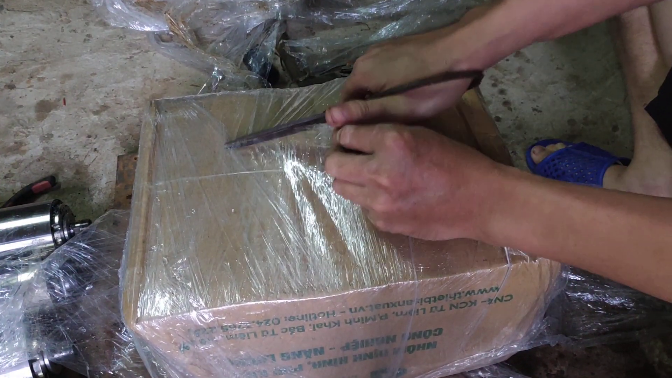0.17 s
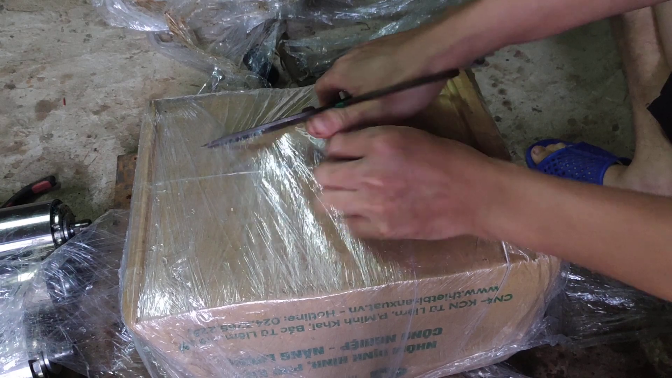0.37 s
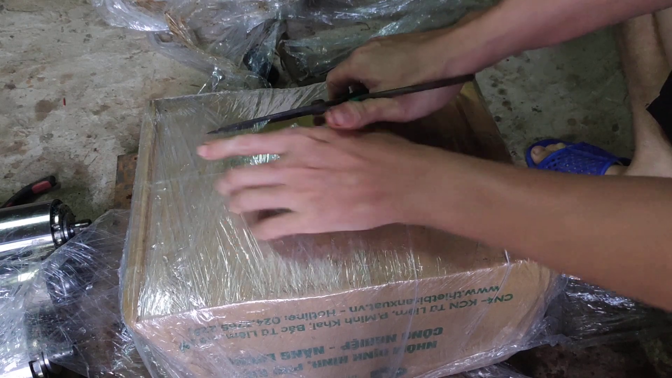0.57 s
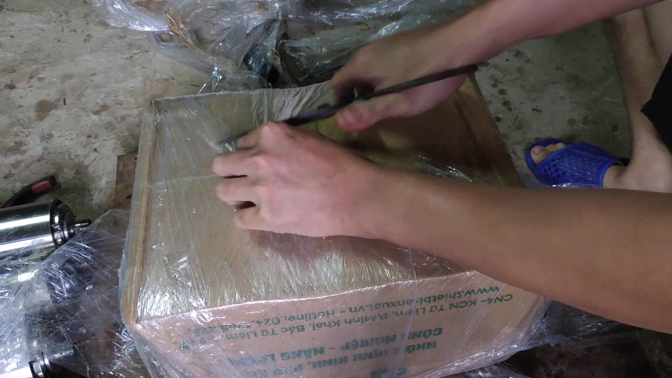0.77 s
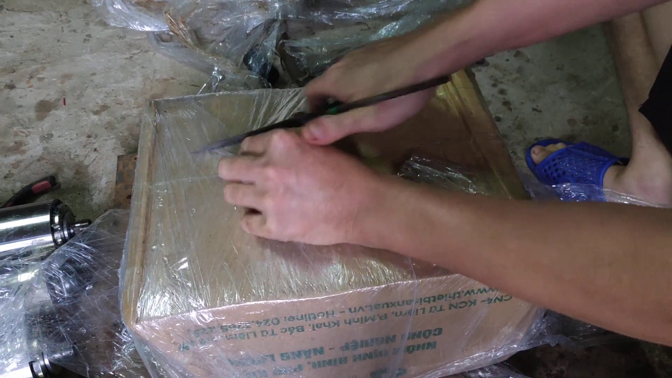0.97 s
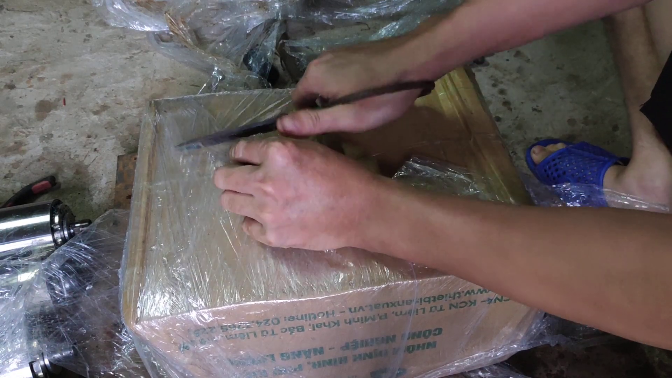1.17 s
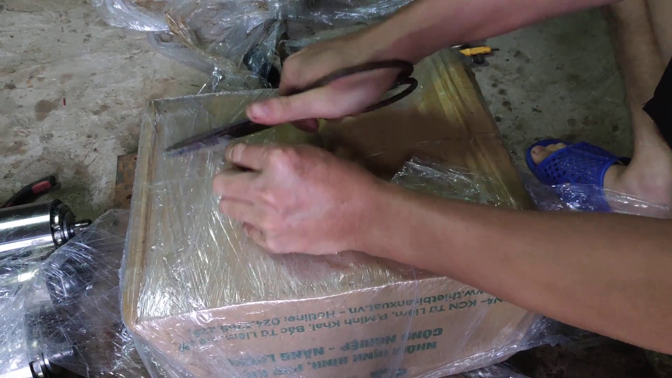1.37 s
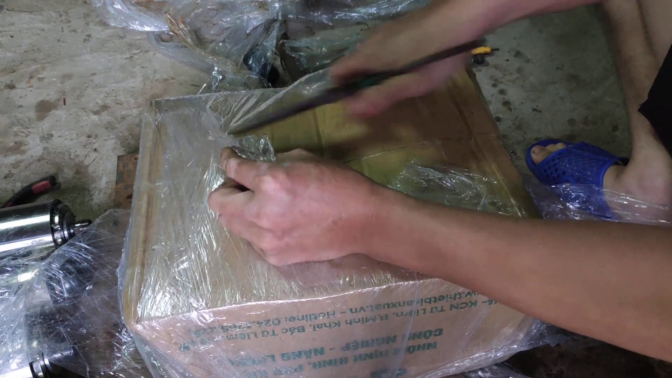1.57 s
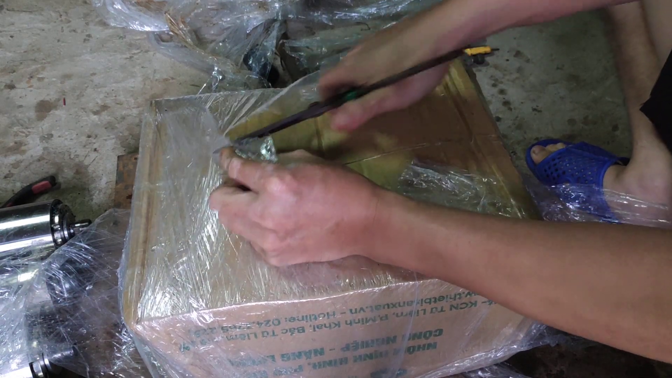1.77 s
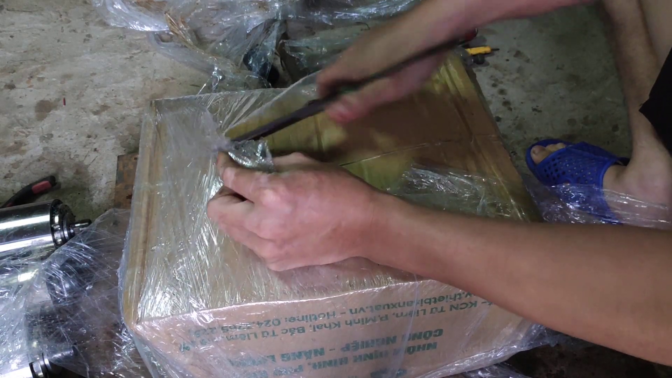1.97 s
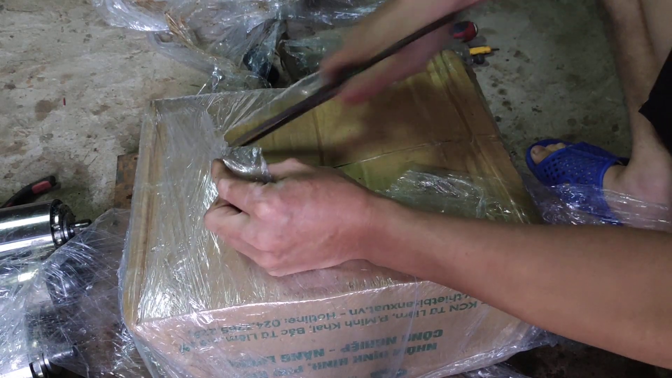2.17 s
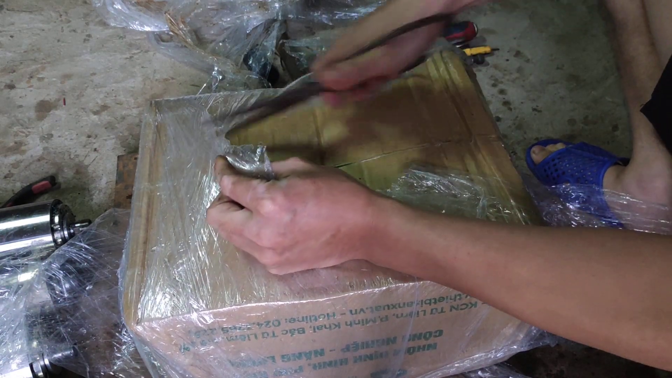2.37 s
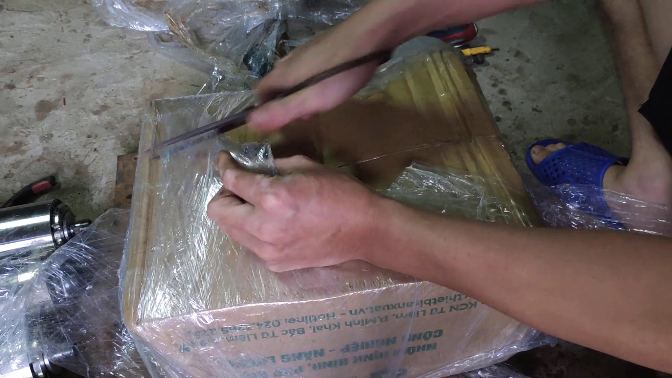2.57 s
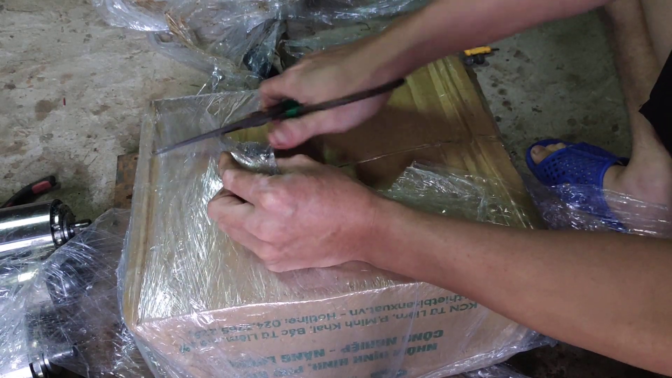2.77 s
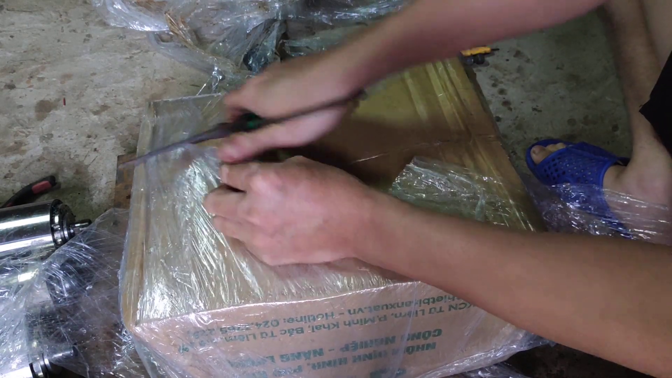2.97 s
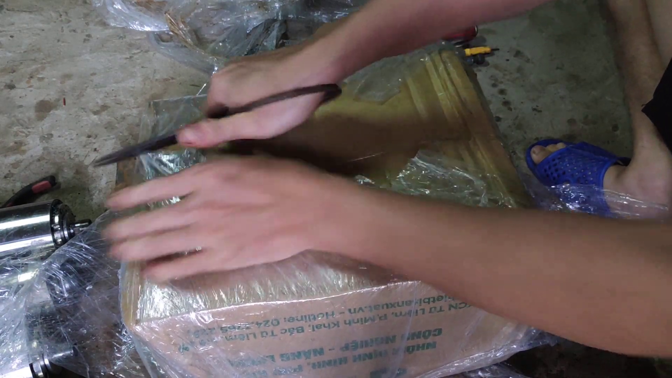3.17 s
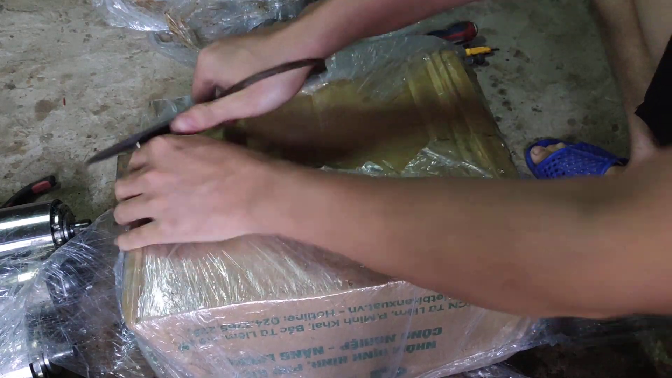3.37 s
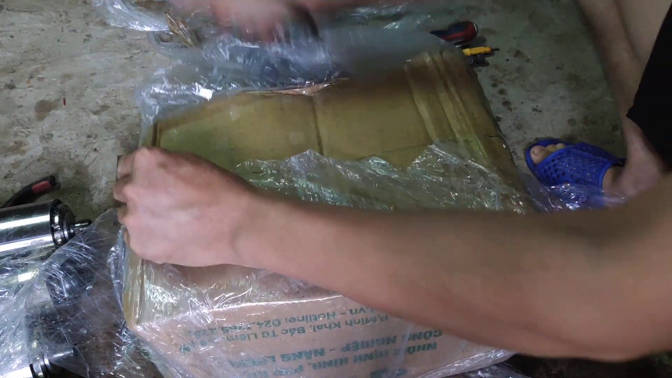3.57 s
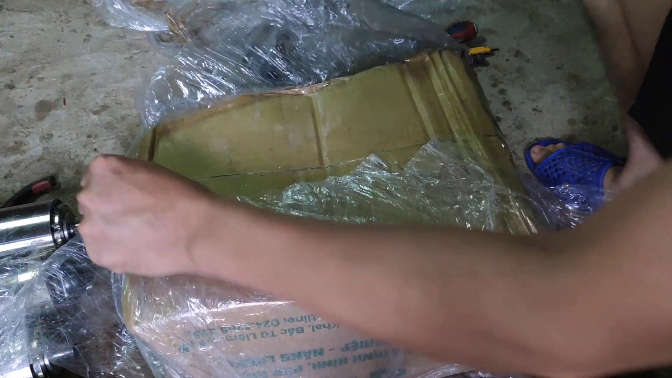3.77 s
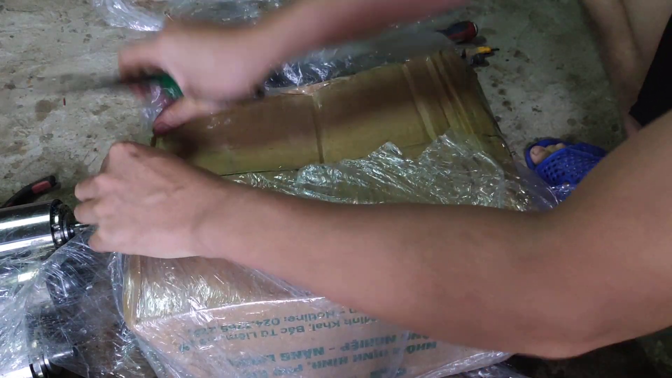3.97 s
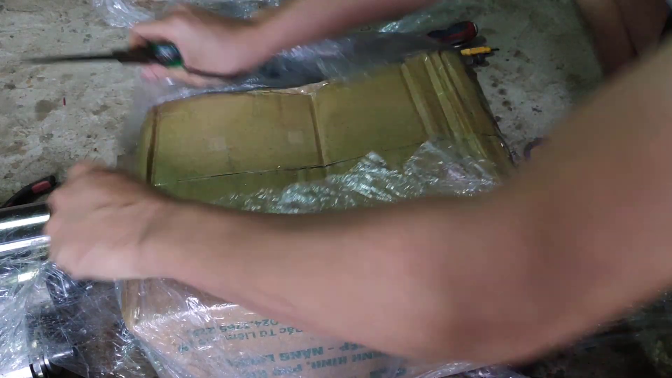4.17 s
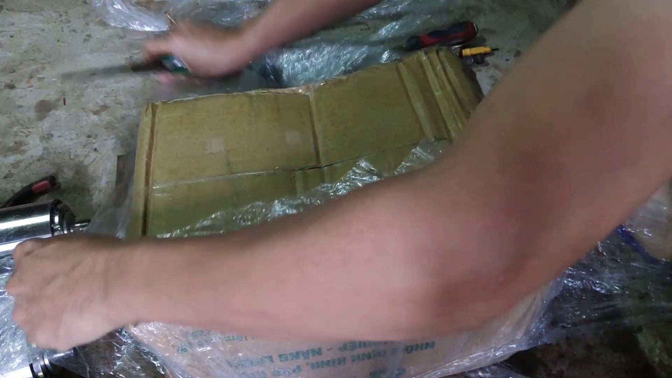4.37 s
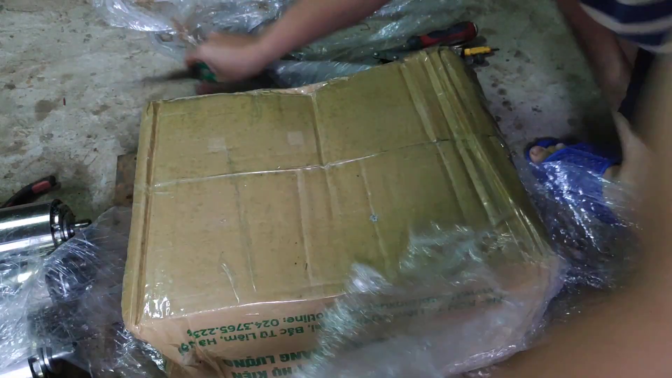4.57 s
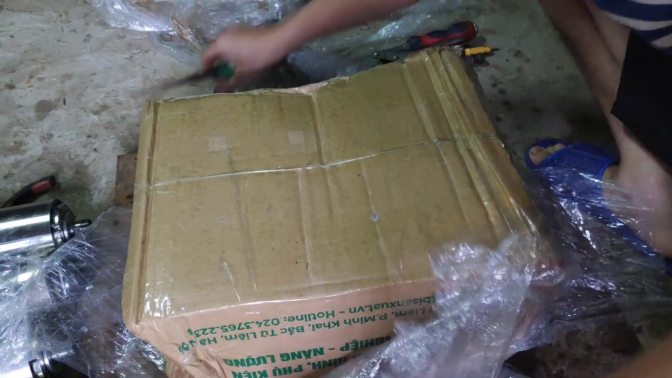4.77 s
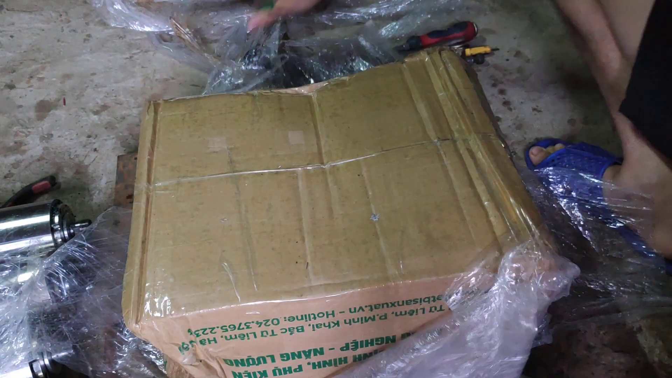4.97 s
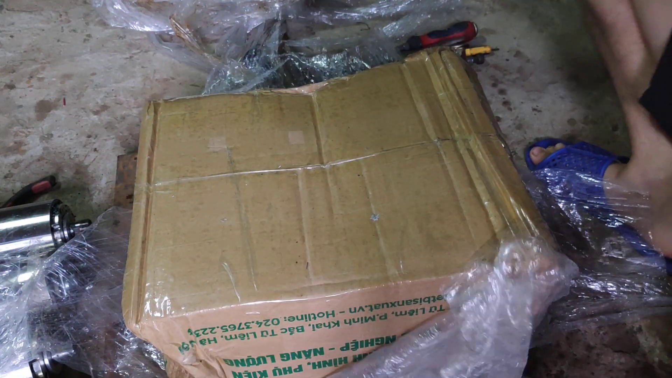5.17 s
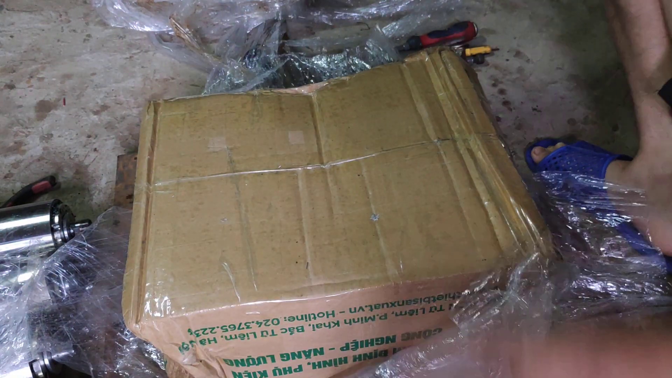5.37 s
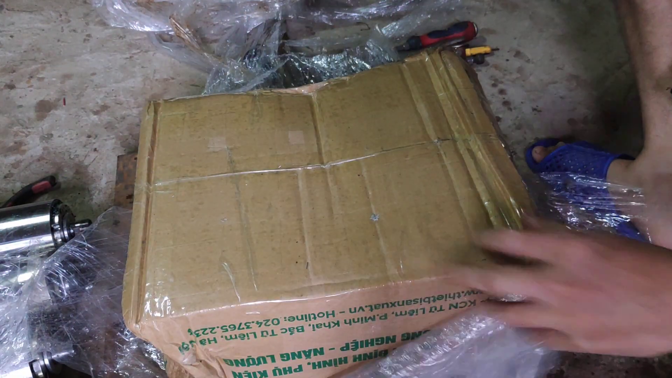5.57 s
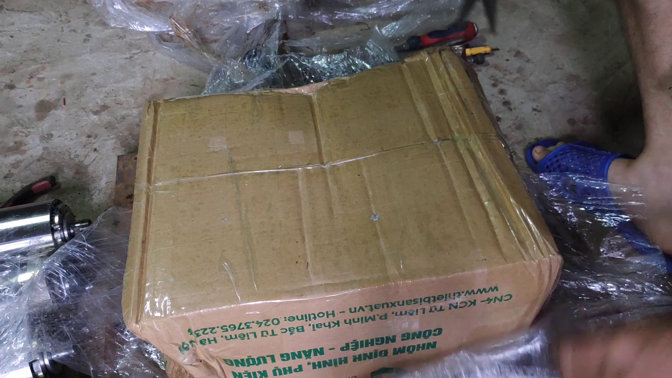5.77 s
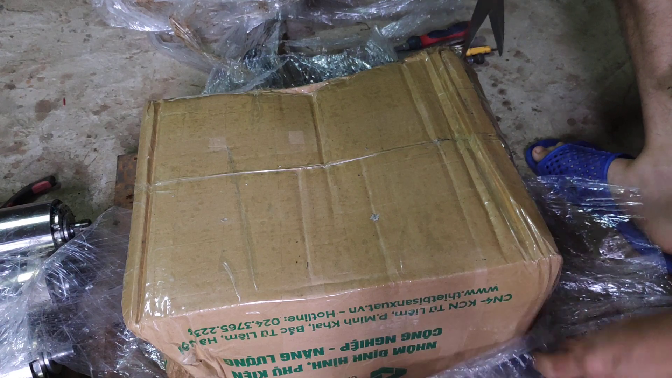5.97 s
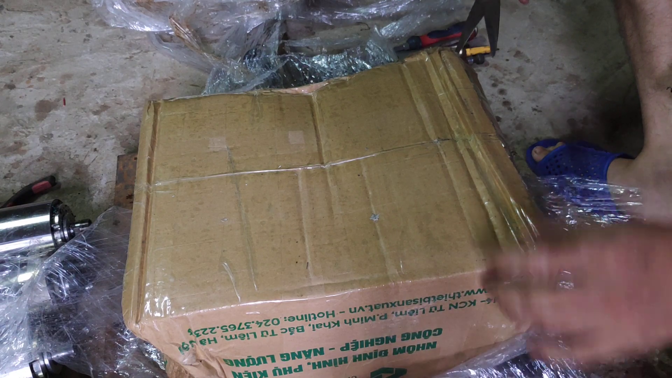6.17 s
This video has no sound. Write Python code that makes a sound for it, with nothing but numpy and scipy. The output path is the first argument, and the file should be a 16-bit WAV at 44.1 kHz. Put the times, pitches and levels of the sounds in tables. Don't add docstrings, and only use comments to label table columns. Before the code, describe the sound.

Close, bright crinkling of stretch wrap comes in uneven bursts with crisp snaps, tears hardest past four seconds, then thins out and fades.

```python
import sys
import numpy as np
from scipy import signal
from scipy.fft import rfft, irfft, next_fast_len
from scipy.io import wavfile
from scipy.ndimage import map_coordinates

SR = 44100
rng = np.random.default_rng(int(sys.argv[2]) if len(sys.argv) > 2 else 0)


def unload_audio(sound):
    columns = np.transpose(np.atleast_2d(sound))
    steps = np.round(np.clip(columns, -1, 1) * 32767)
    wavfile.write(sys.argv[1], SR, steps.astype(np.int16))


def natural_amplitude(level_db):
    exponent = np.asarray(level_db, float) / 20
    return 10 ** exponent


N = 274504


def unit(x):
    return x / np.sqrt(np.mean(x ** 2) + 1e-20)


def along(points, hz):
    f, v = np.transpose(points)
    return np.interp(np.log(hz + 1), np.log(f + 1), v)


def wobble(rate):
    knots = rng.standard_normal(int(N * rate / SR) + 4)
    return map_coordinates(knots, [np.arange(N) * rate / SR])


def filtered(x, response):
    m = next_fast_len(N + SR // 4)
    spectrum = rfft(x, m) * response(np.fft.rfftfreq(m, 1 / SR))
    return irfft(spectrum, m)[..., :N]


def causal(points):
    grid = np.linspace(0, SR / 2, 4097)
    cepstrum = irfft(np.log(natural_amplitude(along(points, grid))))
    half = len(cepstrum) // 2
    cepstrum[1:half] *= 2
    cepstrum[half + 1:] = 0
    response = np.exp(rfft(cepstrum))
    return lambda hz: np.interp(hz, grid, response)


def diffuse(x, t60, wet_db):
    fade = natural_amplitude(-2 * 60 / (t60 * SR))
    energy = signal.lfilter([1 - fade], [1, -fade], x ** 2)
    return x + natural_amplitude(wet_db) * np.sqrt(np.abs(energy)) * rng.standard_normal(x.shape)


# frequency in [Hz], left-right likeness [0 to 1].
LIKENESS = [(60, 0.96), (270, 1), (600, 0.53), (1500, 0), (3000, 0.39)]


def drone(colour):
    def mid_side_gain(hz):
        turn = np.arccos(np.clip(along(LIKENESS, hz), -1, 1)) / 2
        return natural_amplitude(along(colour, hz)) * [np.cos(turn), np.sin(turn)]
    mid, side = filtered(rng.standard_normal((2, N)), mid_side_gain)
    return unit(np.array([mid + side, mid - side]))


# time in [s], level in [dB].
RUMBLE = [(0.0, -47.5), (0.22, -54.5), (0.33, -50.5), (0.94, -54), (1.02, -48), (1.42, -54.5), (1.75, -47),
          (1.89, -53.5), (3.03, -50.5), (3.08, -61), (3.17, -48), (3.27, -55), (3.38, -46), (3.64, -53),
          (3.71, -49.5), (4.12, -54), (4.21, -49.5), (4.5, -56), (4.57, -47), (4.76, -55.5), (5.42, -53.5),
          (6.22, -58.5)]
# frequency in [Hz], level in [dB].
RUMBLE_COLOUR = [(15, -16), (30, -3.5), (50, -1), (75, -5), (130, -8.5), (200, -14.5), (400, -33),
                 (16000, -90)]
# frequency in [Hz], level in [dB].
HUM_COLOUR = [(60, -27), (200, -6), (400, -4), (700, -15.5), (2000, -14.5), (6000, -20), (16000, -36)]


def workshop():
    rumble_db = np.interp(np.arange(N) / SR, *np.transpose(RUMBLE))
    rumble = natural_amplitude(rumble_db + 0.5 + 2.15 * wobble(12)) * drone(RUMBLE_COLOUR)
    return rumble + natural_amplitude(-58.5) * drone(HUM_COLOUR)


def clicks(colour, spread_db, clump_db, lag, scatter, near_db):
    size = rng.standard_normal(N) * natural_amplitude(np.minimum(spread_db * rng.exponential(size=N), 24))
    size *= natural_amplitude(clump_db * (wobble(30) + wobble(100) + 0.64 * wobble(350)))
    delay = np.rint(lag + scatter * rng.standard_normal(N)).astype(int)
    late = np.clip(np.arange(N) + delay, 0, N - 1)
    pair = np.array([np.bincount(late, size, N), size])
    pair = diffuse(pair, t60=0.017, wet_db=near_db)
    pair = diffuse(pair, t60=0.15, wet_db=-10)
    return unit(filtered(pair, causal(colour)))


# time in [s], crinkle in [dB], taut panel in [dB], box in [dB],
# fizz of the finest creases in [dB re crinkle].
PULL = [(0.0, -32, -43, -50, -17), (0.058, -39.5, -50, -57, -13.0), (0.071, -30.5, -35, -52.0, -13.0),
        (0.11, -31, -42.5, -53, -10), (0.232, -39, -53, -58.5, -10), (0.345, -37, -54.5, -57, -8),
        (0.391, -39.5, -56.5, -61, -11), (0.426, -32.5, -48, -57, -10), (0.468, -37.0, -56.5, -58, -8),
        (0.527, -32, -46, -49, -10.5), (0.56, -35.5, -50, -52, -12.5), (0.669, -31.5, -49.5, -59, -12.0),
        (0.699, -35, -53, -56.0, -9), (0.731, -28, -46, -59, -12.5), (0.781, -34, -55, -56, -9),
        (0.97, -39, -58.5, -60, -9), (0.993, -32.0, -47, -49.5, -12), (1.063, -26, -44, -48, -10),
        (1.127, -35.5, -53.5, -59, -13.5), (1.216, -43, -57, -53, -13.0), (1.248, -32, -55, -54, -15),
        (1.283, -39.5, -57, -53.5, -12.5), (1.344, -33, -47, -52, -14.0), (1.399, -37, -55, -59, -14.0),
        (1.436, -38, -60.5, -60, -11), (1.534, -28.5, -44, -47.5, -8), (1.592, -30, -44.5, -53.5, -12.0),
        (1.69, -39.5, -56.5, -55, -13.0), (1.855, -40, -59.5, -63, -10), (1.868, -34, -42, -65, -13.0),
        (1.9, -26, -38, -59, -15.0), (1.941, -23, -34, -49, -18), (2.109, -36.5, -47.5, -56.5, -19),
        (2.164, -32.5, -42.5, -55, -14.0), (2.29, -43, -58.5, -53.0, -13.5), (2.33, -40, -56, -65, -13),
        (2.528, -40.5, -59.5, -55.5, -14.0), (2.588, -34, -52.5, -47, -11),
        (2.699, -44.5, -64.5, -57.5, -12), (2.786, -39, -53, -47.5, -14.0), (2.86, -40, -62, -54.0, -14),
        (2.914, -31, -55, -55, -13.5), (2.924, -35, -51, -51, -11), (2.952, -26.5, -45.5, -44, -16),
        (3.053, -31, -50.0, -55, -13.5), (3.111, -25.5, -43.5, -42.5, -12.0), (3.342, -40, -61.5, -55, -11),
        (3.42, -34.5, -52, -49.5, -10), (3.472, -29, -48.5, -52, -13), (3.546, -24.5, -40.5, -44.0, -8),
        (3.571, -25.5, -45, -37, -12), (3.722, -28.5, -46.5, -47.5, -12.0),
        (3.791, -32.5, -52.5, -52.5, -11), (3.963, -38.5, -59, -58.0, -12), (4.12, -26.5, -44.5, -47, -4),
        (4.188, -16.5, -39.5, -38.5, -10), (4.443, -20, -42, -43.5, -12),
        (4.573, -16.5, -32.5, -37.5, -12.5), (4.758, -35, -52, -55.5, -11), (4.915, -32.5, -47.5, -54, -9),
        (5.015, -24, -44.5, -48.5, -12.0), (5.143, -37.5, -56, -55, -10), (5.248, -35.5, -52.5, -61, -7),
        (5.43, -49.0, -69, -66, -10), (5.503, -46.5, -61.5, -62, -11), (5.64, -28, -42, -43.5, -8),
        (5.71, -31.0, -46.5, -53, -11), (5.762, -38.5, -55.5, -62, -12.0), (5.806, -25, -44, -47, -10),
        (5.835, -28, -48.5, -54, -9), (5.966, -40.5, -56.5, -62.5, -10.5), (6.086, -46, -59, -61, -14.5),
        (6.143, -41, -59, -63, -17.0), (6.224, -45, -64, -69, -17.0)]
# frequency in [Hz], level in [dB].
FILM_COLOUR = [(300, -32), (1000, -18), (2500, -6.5), (4000, -1.5), (6000, -2), (9000, 0.5), (12000, -0.5),
               (16000, -1)]
# frequency in [Hz], level in [dB].
FIZZ_COLOUR = [(5000, -33), (9000, -12.5), (12000, -5), (16000, 0)]
# frequency in [Hz], level in [dB].
PANEL_COLOUR = [(300, -30.5), (800, -4), (1300, 2), (2200, -0.5), (3200, -0.5), (5000, -12), (9000, -50)]
# frequency in [Hz], level in [dB].
BOX_COLOUR = [(60, -29), (150, -6.5), (300, 0.5), (550, -1.5), (900, -6.5), (2000, -30)]


def crinkle():
    s, *levels = np.transpose(PULL)
    film_db, panel_db, box_db, fizz_db = [np.interp(np.arange(N) / SR, s, db) for db in levels]
    film = clicks(FILM_COLOUR, spread_db=3.5, clump_db=0.66, lag=6, scatter=3, near_db=-2.5)
    fizz = clicks(FIZZ_COLOUR, spread_db=5.0, clump_db=2.3, lag=6, scatter=3, near_db=-4)
    panel = clicks(PANEL_COLOUR, spread_db=3.5, clump_db=1.44, lag=5.6, scatter=3.5, near_db=-6)
    box = clicks(BOX_COLOUR, spread_db=6, clump_db=3.0, lag=4.6, scatter=3.6, near_db=-13)
    sheet = natural_amplitude(film_db - 9) * (film + natural_amplitude(fizz_db + 15) * fizz)
    return sheet + natural_amplitude(panel_db + 1.0) * panel + natural_amplitude(box_db - 1.5) * box


def snap_echo(x):
    near = diffuse(x[:, :N], t60=0.016, wet_db=-8.5)
    return diffuse(near, t60=0.089, wet_db=-14.5)


# time in [s], peak in [dB], length in [ms], panel ring in [dB],
# panel frequency in [Hz], left over right in [dB].
SNAPS = [(0.0179, -22.0, 1.3, -37.0, 1760, 9), (0.054, -25.0, 1.9, -38.0, 1700, -1),
         (0.0623, -5.5, 1.11, -17, 1290.0, -2.5), (0.066, -25, 2.7, -23.5, 1340.0, 0.0),
         (0.1548, -25.0, 1.5, -40, 900.0, 5.0), (0.172, -19, 1.1, -39.0, 1400.0, 5),
         (0.2192, -31, 1.06, -47, 1030.0, 7), (0.2846, -24.5, 0.8, -51.0, 3120.0, 8),
         (0.4234, -25.5, 1.0, -42, 1600, 11), (0.4465, -30, 1.2, -48, 1310.0, 4.0),
         (0.4816, -26.5, 1.0, -50.0, 2670.0, 8.0), (0.4963, -22, 1.1, -35.5, 1010.0, -3.0),
         (0.539, -26, 4.5, -47, 2520.0, 5), (0.607, -22, 2.5, -44, 1210.0, 0),
         (0.627, -24.5, 1.6, -32, 3190.0, 2.0), (0.6777, -19, 0.88, -35.5, 3080, 10.5),
         (0.7188, -21.0, 1, -45.0, 2800.0, 4), (0.7295, -24, 1.7, -44.0, 2630.0, 7),
         (0.7545, -24, 1.8, -44.0, 2890.0, 8), (0.778, -25, 0.72, -49.0, 520.0, 12),
         (0.8166, -24.5, 1, -45, 2580.0, 11), (0.8342, -24.5, 1.6, -44, 3100.0, 4.0),
         (0.9162, -31, 1.5, -53.0, 3100.0, 4), (0.9744, -11.5, 1.25, -32, 1030.0, 7),
         (1.0216, -20, 1.3, -27.5, 1850.0, -1), (1.0325, -21, 0.73, -41.0, 1380.0, -5.0),
         (1.057, -22, 2.4, -35, 1250.0, 7), (1.195, -19.5, 1.0, -41, 3460, 9.5),
         (1.2126, -32, 1.6, -57, 560.0, 11), (1.2402, -28, 1.1, -52, 3380.0, 1.0),
         (1.2468, -17.5, 0.9, -46, 3490.0, 3.0), (1.3042, -20, 1.43, -36, 1060, 7),
         (1.311, -25, 0.91, -40, 520.0, 6), (1.3457, -20, 0.92, -35, 1530.0, 4),
         (1.3493, -22, 2.3, -32, 1350, -3), (1.378, -19, 1.3, -37, 2430.0, 4),
         (1.4769, -26, 1.5, -31, 2820.0, 6), (1.481, -25.0, 2.7, -39.0, 1160.0, -2),
         (1.508, -26, 1.5, -48.0, 3100.0, 3), (1.524, -18, 2.6, -37, 1270.0, 2),
         (1.529, -12, 1.4, -20.5, 1140, 1), (1.545, -25, 1.8, -46, 1210.0, 6),
         (1.577, -18.5, 0.91, -34, 2130.0, 8.0), (1.592, -24.5, 2.7, -36, 1640.0, 4),
         (1.7468, -28.5, 1.1, -53.0, 600.0, 4), (1.8255, -30.5, 1.1, -52.0, 2410.0, 7),
         (1.8575, -23, 2.5, -31, 1650, -7), (1.8613, -9.0, 2.5, -21, 1290, -0.5),
         (1.8662, -29, 1.4, -23.5, 1840, -1), (2.0744, -25.5, 2.2, -43, 1360.0, -5),
         (2.136, -30.5, 1.6, -45.0, 2330.0, -2), (2.479, -29.5, 2.6, -53, 3490.0, 1),
         (2.7235, -25.0, 1.4, -38, 2430.0, -8.0), (2.774, -28.0, 2.3, -42, 600.0, 0),
         (2.8037, -22.5, 1.6, -38, 600.0, -1), (2.8588, -27, 1.4, -50, 780.0, 1.0),
         (2.9178, -9, 1.74, -28.5, 540.0, -8.5), (3.0045, -19, 1.7, -42.0, 2950.0, 1),
         (3.0962, -26, 2.2, -39.0, 2860.0, -2.0), (3.111, -10.0, 2, -27, 1260, -5),
         (3.1858, -25, 1.1, -46, 3400.0, -6), (3.3675, -24.5, 1.9, -44.0, 1610.0, -5),
         (3.4115, -23.5, 1.5, -47.0, 600.0, -3), (3.4178, -20, 1.8, -31, 620.0, -2),
         (3.4708, -26, 3.5, -47, 2650.0, 1.0), (3.537, -14.5, 2.1, -41, 620.0, 3),
         (3.5522, -7.5, 1.55, -22, 520.0, 0.5), (3.6537, -20, 3.3, -31, 1250.0, -1.0),
         (3.7315, -21.0, 1.9, -42, 580.0, 2), (4.0957, -18.0, 1.4, -36.0, 1340.0, -2),
         (4.1206, -19.5, 2.2, -36, 580.0, -1.0), (4.1406, -14, 2.4, -31, 560.0, 2),
         (4.1443, -15, 3.5, -30, 520.0, 2), (4.18, -16, 2.3, -44, 690.0, 3.0),
         (4.1968, -19, 4.6, -28, 1340.0, -2), (4.2366, -15, 1.3, -25, 730.0, 2),
         (4.284, -17, 1.8, -32.0, 690.0, -5), (4.3081, -10.5, 2.6, -27, 583, -8),
         (4.3868, -12.5, 1.8, -35, 730.0, -5), (4.504, -12.0, 2, -46, 520.0, -1),
         (4.5246, -13, 2.6, -20.5, 3010.0, -7), (4.5541, -11.0, 2.5, -24.0, 606, 6),
         (4.7782, -29.5, 1.8, -47.0, 1960.0, 4.0), (4.8784, -26, 2.1, -46.0, 3210.0, 5),
         (4.961, -22.5, 1.9, -33, 1610.0, 7), (4.9764, -18, 1.4, -39.0, 3490.0, 1.0),
         (4.9832, -20.5, 2.6, -33.5, 580.0, -3), (4.9896, -19, 1.1, -35, 2200.0, 8),
         (5.0137, -18.5, 1.8, -36, 970.0, 10), (5.025, -10, 0.73, -32, 1180.0, -3),
         (5.1105, -25, 2.2, -47.0, 2970.0, 4), (5.1866, -29, 1.5, -48.0, 3380.0, 8),
         (5.6751, -16, 1, -34.5, 1210.0, 0), (5.7016, -20.5, 0.81, -46, 1700.0, 14),
         (5.7215, -24.0, 1.2, -45.0, 3340.0, 2), (5.784, -17.5, 1.3, -34, 3210.0, -2.0),
         (5.7934, -18, 0.9, -39, 3290.0, 12), (5.803, -14, 1.5, -23, 1870, 2),
         (5.808, -17, 1.6, -35, 520.0, -6), (5.8123, -14.5, 2.0, -43, 3380.0, 4.0),
         (5.8434, -5.5, 0.84, -22.5, 3170, -4.5), (5.9313, -20.5, 1.15, -54, 1680.0, 0)]
# frequency in [Hz], level in [dB].
CRACK_COLOUR = [(200, -18), (800, -4), (2500, 1.5), (5000, -4.5), (8000, -17), (16000, -34)]


def snaps():
    sharp, body, ring = np.zeros((3, 2, N + SR))
    t = np.arange(SR // 50) / SR
    volley = rng.standard_normal((len(SNAPS), 3, len(t)))
    for (s, db, length_ms, body_db, hz, pan_db), (both, left, right) in zip(SNAPS, volley):
        swell_ms = max(0.65 * (length_ms - 0.6), 0.06)
        u = t * 1000 / swell_ms
        burst = (both + 0.68 * np.array([left, right])) * u * np.exp(-u ** 1.86)
        burst = burst / np.linalg.norm(burst, axis=1, keepdims=True)
        note = np.sin(2 * np.pi * hz * t) * natural_amplitude(-60 * t / 0.0079) * (1 - np.exp(-t / 0.00032))
        sharp_gain = natural_amplitude(db - 7) * np.sqrt(abs(length_ms) * SR / 1000)
        for side, lag, sign in [(0, 3, 1), (1, -3, -1)]:
            start = round(s * SR) + lag
            span = slice(start, start + len(t))
            sharp[side, span] += natural_amplitude(sign * pan_db / 2) * sharp_gain * burst[side]
            body[side, span] += natural_amplitude(body_db + 25) * burst[side]
            ring[side, span] += natural_amplitude(body_db + 6) * note
    edge = filtered(snap_echo(sharp), causal(FILM_COLOUR))
    crack = filtered(snap_echo(body), causal(CRACK_COLOUR))
    return edge + crack + ring[:, :N]


# time in [s], peak in [dB], frequency in [Hz], decay time t60 in [s].
KNOCKS = [(.975, -33, 348, 0.034), (1.709, -28.5, 171, 0.038), (2.773, -30, 350, 0.037),
          (2.918, -33, 470, 0.034), (3.148, -33, 387, 0.046), (3.35, -32.5, 68, 0.078),
          (3.552, -24.5, 462, .03), (4.272, -28, 210, 0.065), (4.309, -25, 533, 0.036),
          (4.586, -26, 407, 0.037), (5.802, -38, 420, .03)]


def knocks():
    out, t = np.zeros(N + SR), np.arange(SR // 4) / SR
    for s, db, hz, t60 in KNOCKS:
        decay = natural_amplitude(db + 2.5 - 60 * t / t60)
        soft_start = 1 - np.exp(-t / 0.0029)
        out[round(s * SR):][:len(t)] += decay * np.sin(2 * np.pi * hz * t) * soft_start
    return out[:N]


def scene():
    return workshop() + crinkle() + snaps() + knocks()


def band_limit(x):
    return signal.sosfilt(signal.butter(12, 16950, fs=SR, output="sos"), x)


# resonance in [Hz], width in [Hz].
PORTS = [(9350, 1340), (7410, 1150)]


def record(dry):
    def cavity(f):
        return np.array([c * c / (c * c - f * f + 1j * f * width) for c, width in PORTS])
    x = filtered(dry, cavity)
    x = x / (1 + np.abs(x / 1.02) ** 6) ** (1 / 6)
    mix = filtered(x, lambda hz: hz < 15750)
    return band_limit(mix)


dry = scene()
out = record(dry)
unload_audio(out)
```